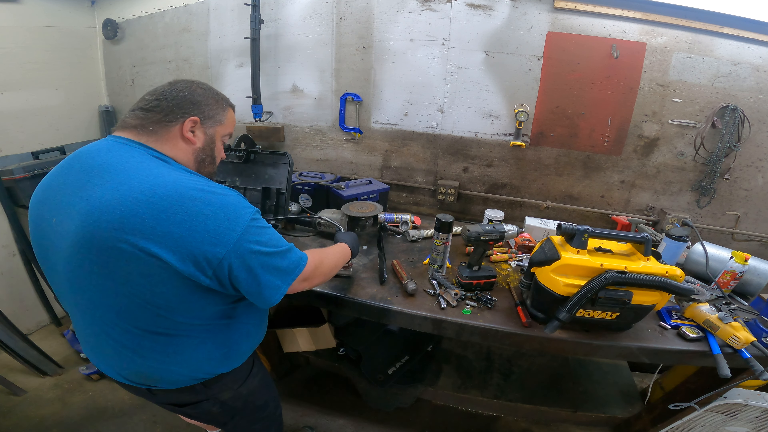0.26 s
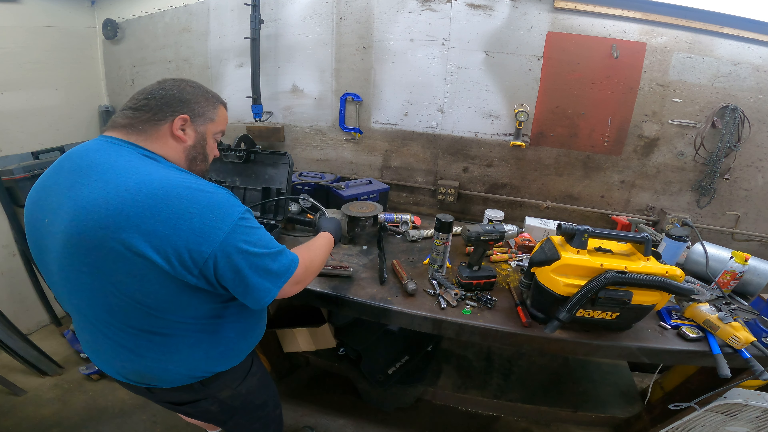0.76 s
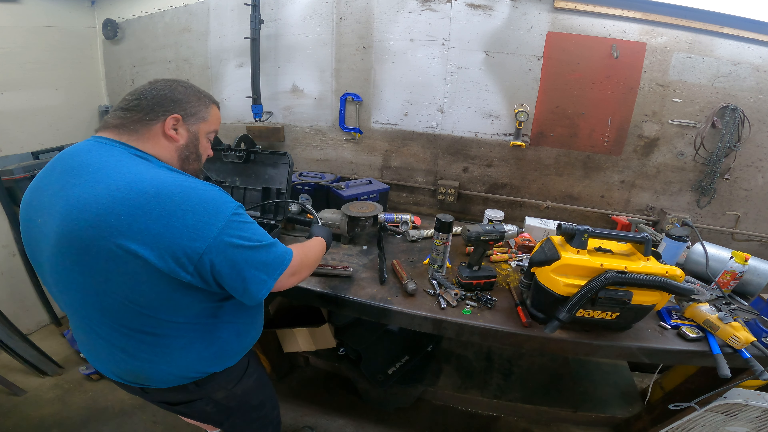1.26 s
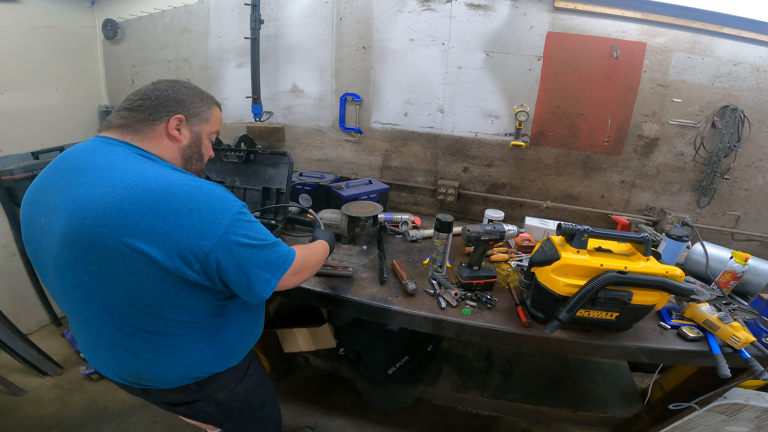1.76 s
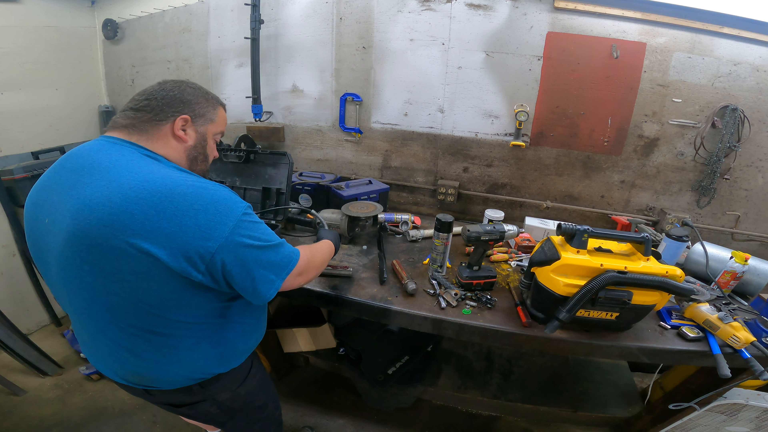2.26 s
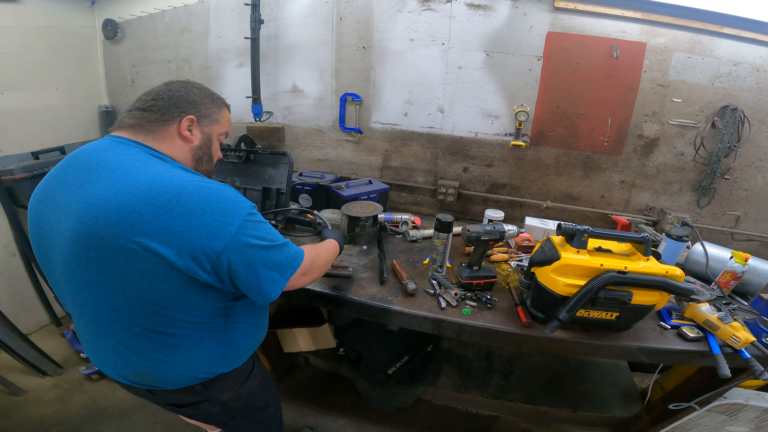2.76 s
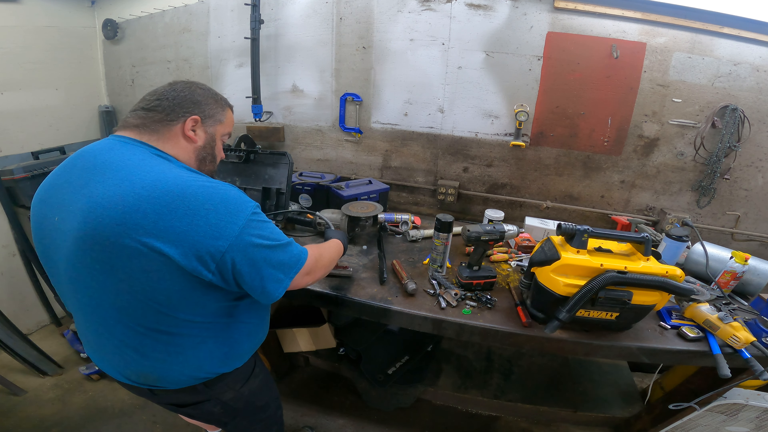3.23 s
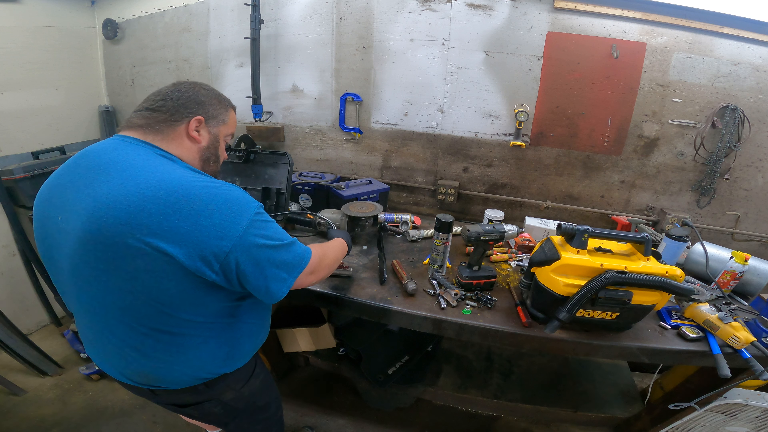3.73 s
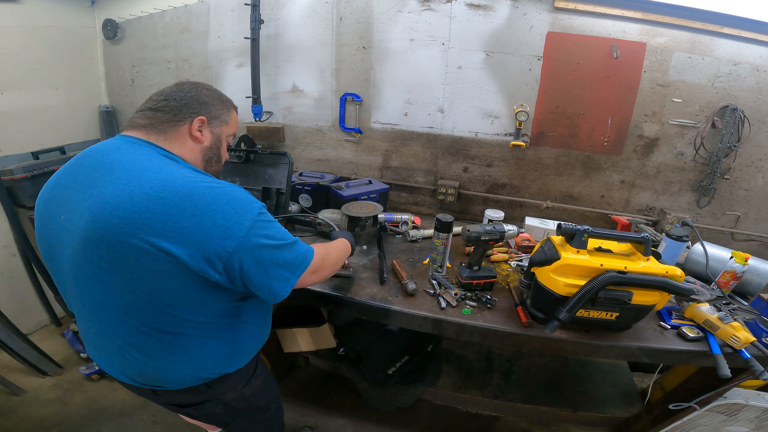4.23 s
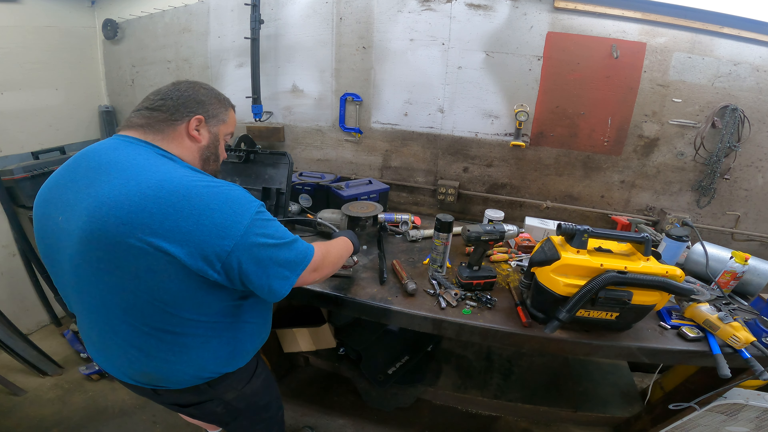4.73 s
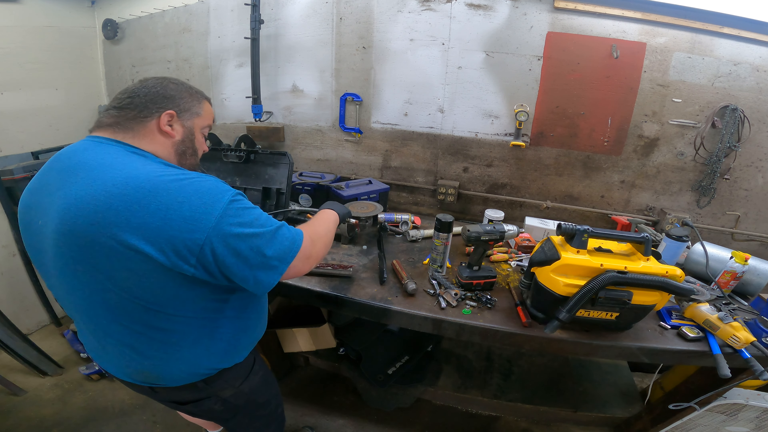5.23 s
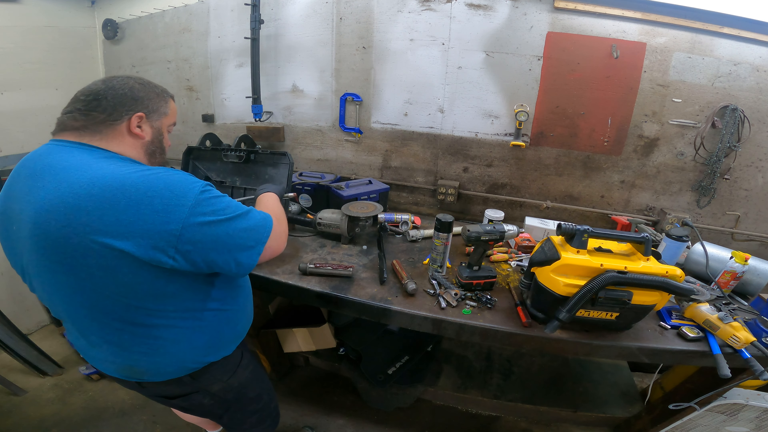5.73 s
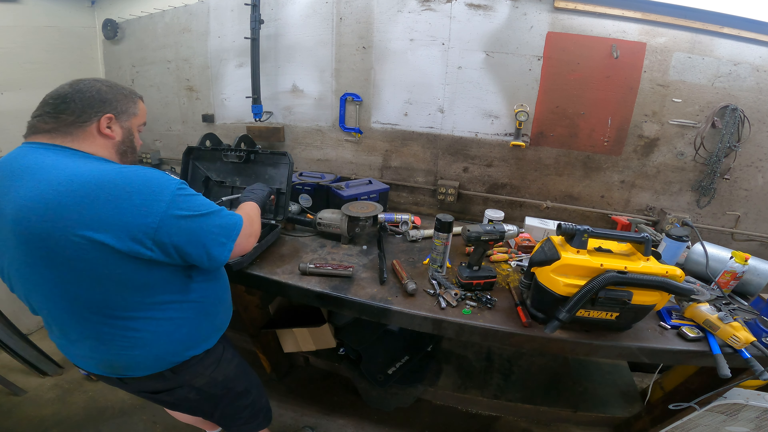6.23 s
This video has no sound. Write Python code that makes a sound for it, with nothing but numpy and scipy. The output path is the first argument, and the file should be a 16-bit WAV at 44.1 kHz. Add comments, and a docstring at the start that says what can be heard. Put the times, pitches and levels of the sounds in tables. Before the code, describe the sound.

In a reverberant workshop, a cordless grease pump whines and rattles briefly, cuts off, and its echo dies away. Light bench taps, a small metal click and soft rubbing fill the gap. Then a longer run: a high steady gear whine over coarse motor noise, dipping and rattling with each fast plunger stroke. It brakes quickly, a sharp knock bumps the microphone mount, and afterwards only quiet handling, another dull thump and low room air remain.

```python
"""Battery grease gun in a workshop

A battery grease gun, already running at the start, stops and is then triggered again in an echoing workshop.
Its motor and gears whine as tones tied to the shaft speed, over a whirr of noise. Five times a second the
plunger meets the grease: the motor sags and gear knocks ring the housing. Around this are a steady room hum,
rustling, small taps and ticks made of noise, and dull knocks that reach the microphone through its mount."""
import sys
import numpy as np
from scipy import signal
from scipy.fft import rfft, irfft
from scipy.io import wavfile

SR = 44100
rng = np.random.default_rng(int(sys.argv[2]) if len(sys.argv) > 2 else 0)


def waveform_to_disk(signal):
    """Save audio, clipped to [-1, 1], as 16-bit WAV at the path in sys.argv[1]."""
    frames = np.transpose(np.atleast_2d(signal))
    scaled = np.clip(frames, -1, 1) * 32767
    samples = np.round(scaled).astype(np.int16)
    wavfile.write(sys.argv[1], SR, samples)


N = 286196
LEAD = SR // 2  # samples played before the start, so that echoes and filters have run in

# The trigger: start_s, brake_s
RUNS = [(-.5, .356), (1.433, 4.586)]
# The plunger meets the grease: start_s, push_db (rattle above the idle rattle)
STROKES = [(-.119, -3), (.087, 6), (.29, 6), (1.582, 9.5), (1.784, 7), (1.988, 7), (2.191, 7.5), (2.394, 8),
           (2.596, 6.5), (2.8, 7), (3.001, 7.5), (3.203, 5.5), (3.409, 6.5), (3.612, 6), (3.815, 7),
           (4.017, 7.5), (4.221, 8.5), (4.423, 7)]

FREE_HZ = 358.6  # shaft speed that the motor settles to without load
SAG_HZ = 24.5  # how strongly a stroke slows the shaft
TREBLE_FROM_HZ = 7000


def amp(db):
    """Turn decibels into a plain gain."""
    return 10 ** (np.asarray(db) / 20)


def rms_one(x):
    """Scale a signal to an average (rms) level of 1."""
    return x / np.sqrt(np.mean(x ** 2) + 1e-20)


def clock():
    """Time in seconds of every sample; the lead-in is negative."""
    return (np.arange(N + LEAD) - LEAD) / SR


def at_hz(points, hz):
    """Read a curve between its points, on a logarithmic frequency scale."""
    point_hz, value = np.array(points).T
    return np.interp(np.log(np.maximum(hz, 1)), np.log(point_hz), value)


def shade(x, points, share=1):
    """Colour a sound by a curve of gain in dB against frequency, or by a share of it."""
    size = x.shape[-1]
    gain = amp(share * at_hz(points, np.fft.rfftfreq(size, 1 / SR)))
    return irfft(rfft(x) * gain, size)


def lag(x, seconds):
    """Smooth a signal so that it follows changes late (one-pole filter)."""
    r = np.exp(-1 / (max(seconds, 1e-4) * SR))
    return signal.lfilter([1 - r], [1, -r], x + 1e-18)


def drift(rate_hz):
    """Wander by chance around zero with spread 1: noise smoothed twice."""
    seconds = 1 / (2 * np.pi * rate_hz)
    return rms_one(lag(lag(rng.standard_normal(N + LEAD), seconds), seconds))


def resonance(x, hz, width):
    """Ring at one frequency; a narrow width in Hz rings longer."""
    r = np.exp(-np.pi * width / SR)
    feed = np.array([1, 0, -1]) * (1 - r * r) / 2
    return signal.lfilter(feed, [1, -2 * r * np.cos(2 * np.pi * hz / SR), r * r], x)


def gate(start, length, edge=.002):
    """1 from start for length seconds, with short ramps inside."""
    t = clock()
    return np.clip(np.minimum(t - start, start + length - t) / edge, 0, 1)


def die_away(start, decay_s):
    """Begin suddenly at 1 and die away exponentially."""
    age = clock() - start
    return (age > 0) * np.exp(-np.maximum(age, 0) / decay_s)


def hum():
    """Steady air of the building as noise, partly different in each channel, with a faint mains tone."""
    # Colour of the air: pitch_hz, relative level_db (per Hz)
    air_colour = [(12, -2.5), (20, -5.5), (64, 0.5), (85, -11.5), (196, -1.5), (266, -6), (298, -11),
                  (393, -1.5), (478, -4.5), (600, -8), (800, -15), (930, -4), (1410, -9), (5850, -22),
                  (15500, -51)]
    air_db, mains_hz, mains_db = -55, 60, -70.5
    mid, side = shade(rng.standard_normal((2, N + LEAD)), air_colour)
    mains = amp(mains_db + 1.5 * drift(3)) * np.sin(2 * np.pi * mains_hz * clock())
    air = rms_one(np.array([mid + 0.43 * side, mid - 0.32 * side]))
    return amp(air_db + 0.17 * drift(0.91)) * air + mains


def rustle():
    """Each swells and fades: a soft hiss of cloth and gloves, and a dull narrow rub on the bench."""
    # Rustles near the bench: peak_s, rise_s, fall_s, hiss_db, rub_db, rub_hz (centre)
    rustle_events = [(.78, 0.066, 0.22, -65, -56.5, 741), (1.0, 0.05, 0.23, -65, -55.5, 970),
                     (1.42, 0.1, 0.068, -59.5, -64, 433), (5.46, 0.31, 0.39, -59.5, -54.5, 760),
                     (6.15, 0.4, 0.25, -58.5, -59, 192.7), (6.34, 0.073, 0.11, -50, -53.5, 288.6),
                     (6.45, 0.22, .3, -61, -59, 300)]
    # Colour of the hiss: pitch_hz, relative level_db (per Hz)
    hiss_colour = [(710, -33), (1200, 2), (1570, 7.5), (2010, 1), (3980, 2), (7330, -3), (12100, -22),
                   (15500, -42)]
    fade_db = 20  # lost over the rise and over the fall
    t = clock()
    waver = np.sqrt(2) * drift(120)  # makes the rub a narrow noise instead of a pure tone
    hiss = amp(2.0 * drift(40)) * rms_one(shade(rng.standard_normal(N + LEAD), hiss_colour))
    out = 0
    for peak, rise, fall, hiss_db, rub_db, rub_hz in rustle_events:
        swell = amp(-fade_db * np.maximum((peak - t) / rise, (t - peak) / fall))
        rub = waver * np.sin(2 * np.pi * rub_hz * t)
        out = out + swell * (amp(hiss_db) * hiss + amp(rub_db) * rub)
    return out


def taps():
    """Short bursts of noise ring a broad resonance."""
    # Taps on the bench: start_s, relative level_db, pitch_hz (centre), decay_s
    tap_events = [(0.742, -45.5, 500, 0.014), (.8, -54, 220, 0.023), (0.976, -40, 1140, 0.015),
                  (1.305, -62, 3400, .015)]
    attack_s = 0.00079
    noise = rng.standard_normal(N + LEAD)
    out = 0
    for start, db, hz, decay in tap_events:
        burst = lag(die_away(start, decay), attack_s) * noise
        rung = lag(resonance(burst, hz, 0.33 * hz), 0.071 / hz)
        out = out + amp(db) * np.sqrt(SR / hz) * rung  # evens out low and high taps
    return out


def ticks():
    """Very short broad cracks of noise."""
    # Bright ticks of small metal: start_s, relative level_db
    tick_events = [(0.986, -34), (.9925, -45), (1.005, -49), (5.865, -52), (6.205, -52)]
    decay_s = 0.0014
    noise = rng.standard_normal(N + LEAD)
    bursts = sum(amp(db) * die_away(start, decay_s) for start, db in tick_events)
    return lag(resonance(bursts * noise, 3000, 7000), .00002)


def knocks():
    """A click, a quickly damped wobble of the mount and an inward push that the microphone's low cut swings back."""
    # Knocks in the mount: start_s, click_db, push_db, pan_db (left minus right), brightness of the click (0-3)
    mount_knocks = [(4.8394, -11, -20, -6, 2.6), (4.8434, -21, -27, -6, 1), (5.5437, -18, -24.5, -7, .2)]
    mount_hz, mount_t60_s, mount_lag_s, push_length_s = 207, .015, .0002, .0062
    low_cut_hz, low_cut_q = 24, 1.05
    t = clock()
    out = np.zeros((2, N + LEAD))
    for start, click_db, push_db, pan_db, bright in mount_knocks:
        age = np.clip(t - start, 0, 1)
        swing = np.clip(age - mount_lag_s, 0, 1)
        click = -amp(click_db) * (t >= start) * np.exp(-age / 0.00025)
        click = click * (1 + bright * np.cos(2 * np.pi * 4400 * age))
        click = lag(lag(click, .00004), .00004)
        wobble = 1.6 * np.sin(2 * np.pi * mount_hz * swing) * amp(-60 * swing / mount_t60_s)
        push = -np.sin(np.pi * np.clip(swing / push_length_s, 0, 1)) ** 2
        out += (click + amp(push_db) * (wobble + push)) * amp([[pan_db / 2], [-pan_db / 2]])
    r = np.exp(-np.pi * low_cut_hz / low_cut_q / SR)
    return signal.lfilter([1, -2, 1], [1, -2 * r * np.cos(2 * np.pi * low_cut_hz / SR), r * r], out)


def workshop(x):
    """Dense echoes: noise that dies band by band, mostly alike in both channels."""
    # Time for the echo to fall by 60 dB: pitch_hz, decay_s
    echo_t60 = [(200, 0.4), (700, 0.63), (1000, 0.69), (2500, 0.84), (4200, 0.94), (5500, 0.83),
                (8000, 0.77), (14000, 0.48)]
    # Width of the echo: pitch_hz, level_db (side against mid)
    echo_width = [(200, -3.5), (380, -11), (700, -7.5), (1000, -8), (2000, -6.5), (3000, -2), (4300, -7),
                  (6000, -22), (8000, -2.5), (12000, -1.5)]
    echo_db = 3.5
    t = np.arange(SR) / SR
    edges = 80 * 2 ** (np.arange(25) / 3)  # bands a third of an octave wide
    white, tail = rng.standard_normal((2, SR)), 0
    for low, high in zip(edges, edges[1:]):
        band_filter = signal.butter(2, [low, high], "band", fs=SR, output="sos")
        band = signal.sosfilt(band_filter, white)
        t60 = at_hz(echo_t60, np.sqrt(low * high))
        fade = amp(-60 * t / t60) * np.clip(t / 0.0038, 0, 1)
        tail = tail + band * fade * np.sqrt(2 * np.log(1000) / t60 / SR)  # long decays get no extra energy
    mid, side = signal.fftconvolve(x[None], tail, axes=1)[:, :len(x)]
    side = shade(side, echo_width)
    return amp(echo_db) * np.array([mid + side, mid - side])


def motor():
    """Shaft speed (Hz), how far the motor is running (0-1) and braking (0-1); the rotor's inertia slows changes."""
    brake_s, brake_hz = .034, 60
    let_go_s, let_go_hz = .05, 18  # the motor slows before the brake bites
    fresh_hz, fresh_s = 5, .6  # the rested battery drives a little faster at first
    inertia_s, coast_s = .04, 0.048
    sag_lag_s, sag_s, sag_fall_s = .012, .044, .013
    on = sum(gate(start, stop + brake_s - start) for start, stop in RUNS)
    braking = sum(gate(stop, brake_s) for start, stop in RUNS)
    letting_go = sum(gate(stop - let_go_s, let_go_s) for start, stop in RUNS)
    fresh = sum(gate(start, stop - start) * np.exp(-np.maximum(clock() - start, 0) / fresh_s)
                for start, stop in RUNS)
    load = sum(gate(start + sag_lag_s, sag_s) for start, push_db in STROKES)
    bite = np.maximum(load - lag(load, sag_fall_s), 0)  # the load pulls hardest at first
    pull = SAG_HZ * (load + (inertia_s / sag_fall_s - 1) * bite)
    target = FREE_HZ * on + fresh_hz * fresh - pull - let_go_hz * letting_go - brake_hz * braking
    speed = np.maximum(lag(target, inertia_s), 0)
    running = np.maximum(on, lag(on, coast_s))
    return speed, running, braking


def rattle_strength(braking):
    """Strength in dB of the low and high rattle and the chatter: strokes, start and brake shake the housing."""
    rattle_lead_s, push_s = .005, 0.054  # the housing rattles just before the load bites
    settle_share, settle_s = 0.53, 0.018  # loose parts settle after the push
    impact_db, impact_s = 2, 0.0153  # first contact of the plunger
    kick_db, kick_s = 5, .015  # the gears take up their slack
    brake_db, clack_db = 6.5, 6  # the brake's push on the low and on the high modes
    high_share, high_lag_s = 1.0, .009  # the high modes follow a push a little later
    chatter_lag_s, chatter_s, chatter_level_db = 0.0793, 0.0234, 1.5  # the plunger lets go with a thin chatter
    pushes = sum(db * gate(start - rattle_lead_s, push_s, edge=0.007) for start, db in STROKES)
    pushes = np.maximum(pushes, settle_share * lag(pushes, settle_s))
    impacts = impact_db * sum(gate(start, impact_s) for start, db in STROKES)
    kick = kick_db * sum(gate(start, kick_s) for start, stop in RUNS)
    low_db = pushes + impacts + kick + brake_db * braking
    high_db = high_share * lag(pushes, high_lag_s) + clack_db * braking + kick
    chatter_db = chatter_level_db * sum(gate(start + chatter_lag_s, chatter_s) for start, db in STROKES)
    return low_db, high_db, chatter_db


def whirr(speed, rattle_db, chatter_db):
    """Broad noise that surges with each push; its treble grows steeply with the speed alone."""
    # Colour of brushes, fan and gears: pitch_hz, relative level_db (per Hz)
    whirr_colour = [(15, -64), (25, -21), (129, -29), (341, -11), (500, -13), (950, -10.5), (1420, -9.5),
                    (3100, -14), (4170, -8), (4520, -12), (5170, -13), (8000, -21), (12200, -36.5),
                    (15600, -70)]
    whirr_db, load_share, treble_power = -33, 0.22, 3
    noise = rms_one(shade(rng.standard_normal(N + LEAD), whirr_colour))
    low_pass = signal.butter(2, TREBLE_FROM_HZ, fs=SR, output="sos")
    low = signal.sosfiltfilt(low_pass, noise)
    treble = noise - low
    share = speed / FREE_HZ
    low_gain = (.5 + share / 2) ** 0.48 * amp(load_share * rattle_db + 0.58 * chatter_db)
    treble_gain = 0.98 * (0.083 + 0.88 * share ** treble_power)
    return amp(whirr_db + 0.81 * drift(57)) * (low_gain * low + treble_gain * treble)


def rattle(speed, low_db, high_db, chatter_db):
    """Dense uneven gear knocks ring the resonances of the housing."""
    # Modes of the housing: pitch_hz, width_hz, relative level_db
    housing = [(662, 63.4, -5), (911, 79, -0.5), (984, 64, 2.5), (1115, 36.6, 0), (1400, 24, -9),
               (1636, 52, -11), (2460, 1080, -18.5), (2710, 71, -10.5), (4890, 276, -13),
               (6230, 1250, -18.5), (10410, 140, -29), (11970, 550, -32)]
    rattle_db, rattles_per_s = -32.5, 3500
    high_from_hz, chatter_from_hz, high_mode_power = 2000, 1300, .35
    sizes = amp(2.5 * np.minimum(rng.exponential(1, N + LEAD), 5)) * rng.choice([-1, 1], N + LEAD)
    gear_knocks = rms_one(sizes * (rng.random(N + LEAD) < rattles_per_s / SR))
    gear_knocks = gear_knocks * amp(2.04 * drift(31))  # they come in clumps
    share = speed / FREE_HZ
    dull = gear_knocks * amp(low_db)
    sharp = gear_knocks * amp(high_db) * (0.078 + share) ** high_mode_power
    rung, idle_power = 0, 0
    for k, (hz, width, db) in enumerate(housing):
        mode = (-1) ** k * amp(db) * resonance(sharp if hz > high_from_hz else dull, hz, width)
        if hz > TREBLE_FROM_HZ:
            mode = mode * share
        if chatter_from_hz < hz < TREBLE_FROM_HZ:
            mode = mode * amp(chatter_db)
        rung = rung + mode
        idle_power += amp(2 * db) * np.pi * width / SR
    return amp(rattle_db) * rung / idle_power ** .5


def whine(speed):
    """Wavering tones locked to the shaft; most are clearest at a speed of their own, the main gear tone has a curve."""
    # Motor and gear tones: multiple of the shaft speed, best_hz (shaft speed), loss_db (one sag away from there)
    shaft_orders = [(.985, 356, 5), (4, 358, 4), (5, 359, 6), (12, 357, 0), (15, 358, 22), (20, 355, 14),
                    (24.8, 343, 9)]
    # Base level of each tone: level_db (rms)
    tone_levels = [-47, -48, -50, -35.5, -40, -43.5, -50]
    # Change of the shaft's own tone over time: time_s, gain_db
    shaft_tone = [(0, -6.5), (1.5, 1.5), (2.7, 1.5), (3.1, -5.5), (3.5, 0.5), (3.9, -5.5), (4.6, -1)]
    # The main gear tone grows and fades with its pitch: pitch_hz, gain_db
    gear_colour = [(3500, -5.5), (4000, 0), (4050, -2), (4100, -12), (4160, 4.5), (4215, -9.5), (4285, 2.5),
                   (4340, 1)]
    swell_lag_s, swell_s, swell_db = 0.09, 0.078, 6.5  # the shaft's tone swells while the plunger returns
    spin_up_db = 1  # the main gear tone sings out while the motor gathers speed
    slowing_loss_db = 9  # tones fade while the motor runs down
    turns = np.cumsum(speed * (1 + .0017 * drift(80))) / SR
    shaft_db = np.interp(clock(), *np.transpose(shaft_tone))
    swells = sum(gate(start + swell_lag_s, swell_s, edge=0.019) for start, push_db in STROKES)
    shaft_db = shaft_db + swell_db * swells
    share, change = speed / FREE_HZ, np.gradient(speed)
    meshed = np.clip((share - .72) / .1, 0, 1)  # tones emerge late in the spin-up
    rising_db = spin_up_db * (change > 0) * np.clip((.95 - share) / .04, 0, 1)
    out = 0
    for (multiple, best_hz, loss_db), db in zip(shaft_orders, tone_levels):
        away = np.minimum(np.abs(speed - best_hz) / SAG_HZ, 1) ** .75
        # Uneven tooth contact, worse under load
        flutter_db = (1 + away) * (.7 * drift(20) + 1.2 * drift(120))
        level_db = db - loss_db * away + flutter_db
        if multiple < 1:  # the shaft's own tone
            level_db = level_db + shaft_db
        if multiple == 12:  # the main gear tone
            level_db = level_db + rising_db + at_hz(gear_colour, multiple * speed)
        tone = np.sin(2 * np.pi * (multiple * turns + rng.random()))
        out = out + amp(level_db) * np.sqrt(2) * tone
    slowing = lag((change < 0) * np.clip((.94 - share) / .03, 0, 1), .004)
    return meshed * amp(-slowing_loss_db * slowing) * out


def scene():
    """Mix the near sounds with their echoes, lean them in stereo, then add hum and mount knocks."""
    # Shape of the stereo lean, of which each channel takes a share: pitch_hz, lean_db
    stereo_lean = [(60, -4), (240, -4.5), (950, 4.5), (3770, 3.5), (15000, 7)]
    whine_echo_db = -2  # the gear tones beam towards the listener and stir the room less
    speed, running, braking = motor()
    low_db, high_db, chatter_db = rattle_strength(braking)
    tones = running * whine(speed)
    gun = running * (rattle(speed, low_db, high_db, chatter_db) + whirr(speed, low_db, chatter_db))
    near = gun + rustle() + taps() + ticks()
    echoes = workshop(near + amp(whine_echo_db) * tones)
    left, right = near + tones + echoes
    air = np.array([shade(left, stereo_lean, 0.22), shade(right, stereo_lean, -0.09)])
    return (air + hum() + knocks())[:, LEAD:]


def record(dry):
    """Cut the top of the spectrum with a steep low-pass filter."""
    cutoff_hz = 15800
    return signal.sosfilt(signal.cheby2(20, 60, cutoff_hz, fs=SR, output="sos"), dry)


dry = scene()
out = record(dry)
waveform_to_disk(out)
```